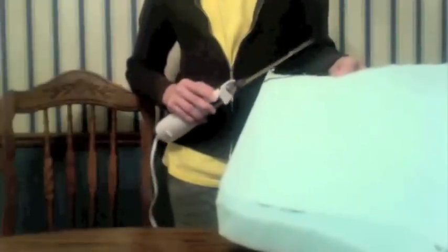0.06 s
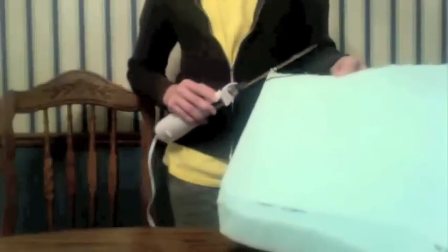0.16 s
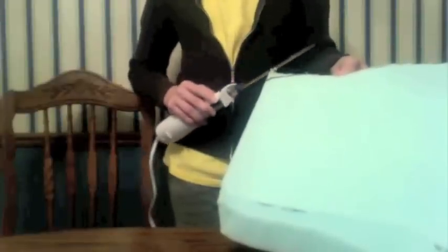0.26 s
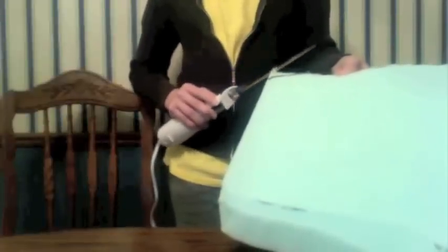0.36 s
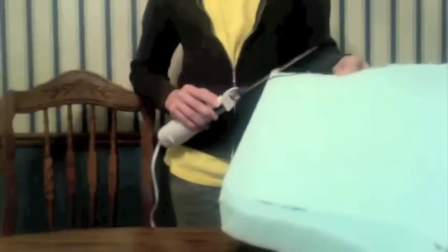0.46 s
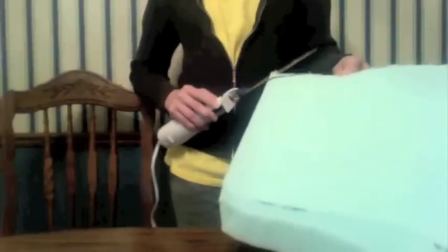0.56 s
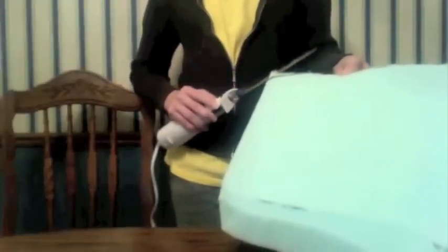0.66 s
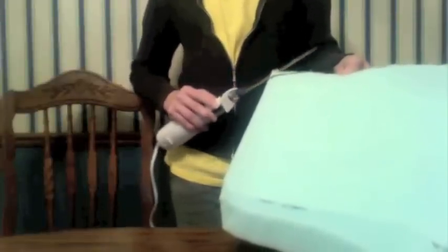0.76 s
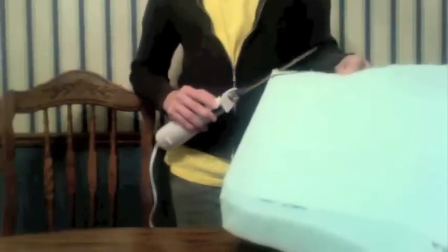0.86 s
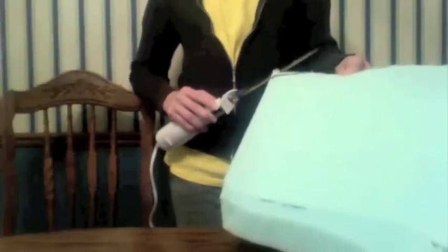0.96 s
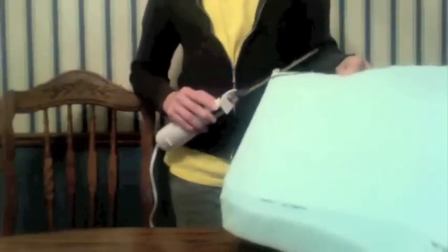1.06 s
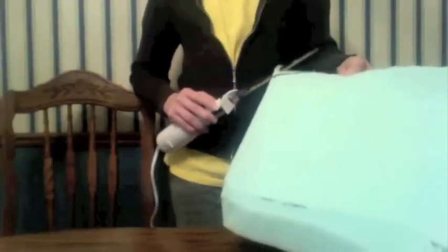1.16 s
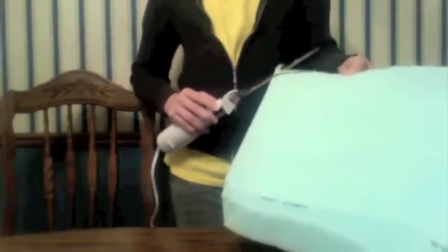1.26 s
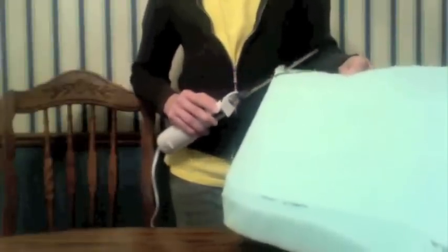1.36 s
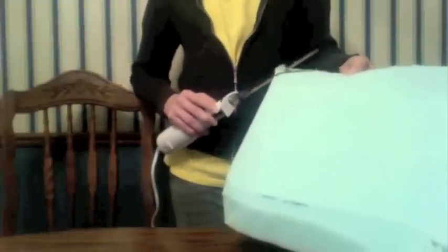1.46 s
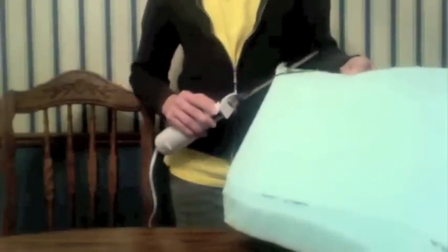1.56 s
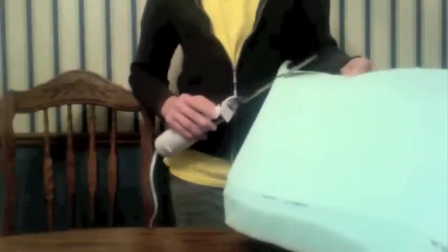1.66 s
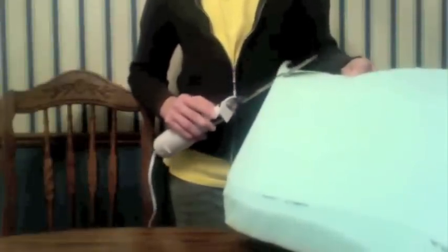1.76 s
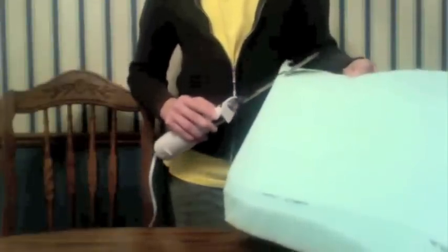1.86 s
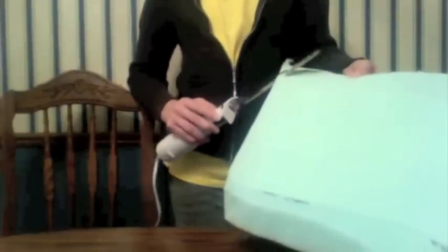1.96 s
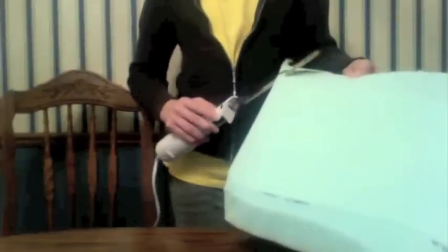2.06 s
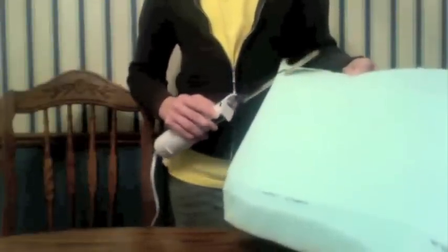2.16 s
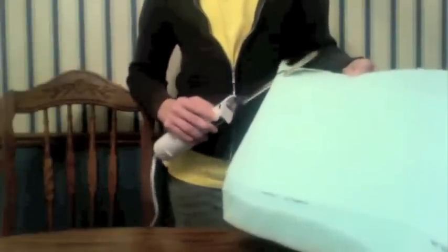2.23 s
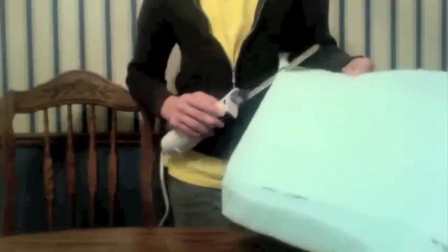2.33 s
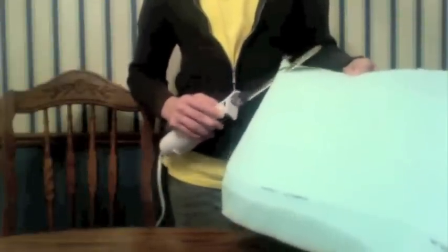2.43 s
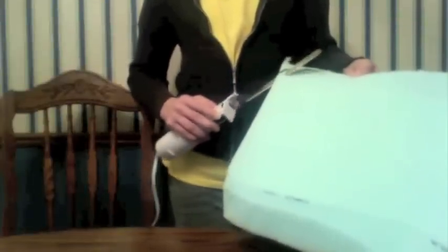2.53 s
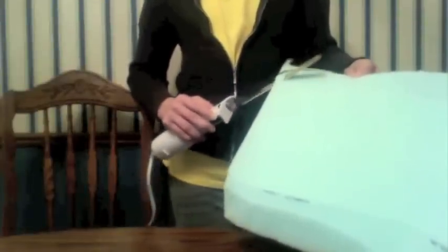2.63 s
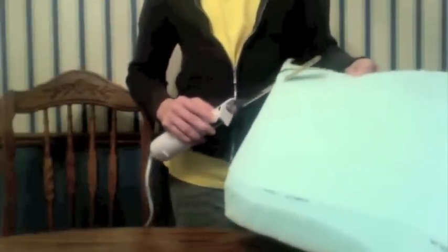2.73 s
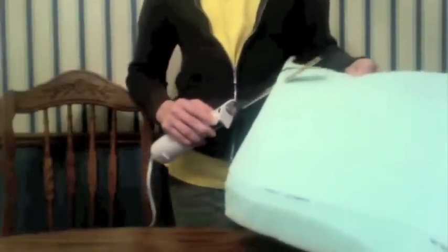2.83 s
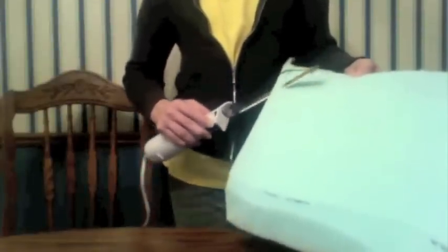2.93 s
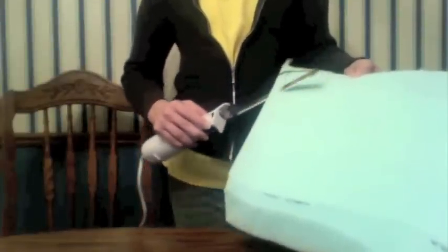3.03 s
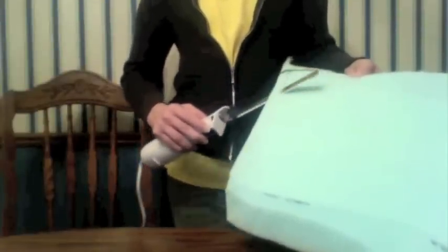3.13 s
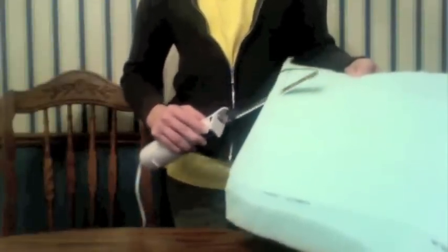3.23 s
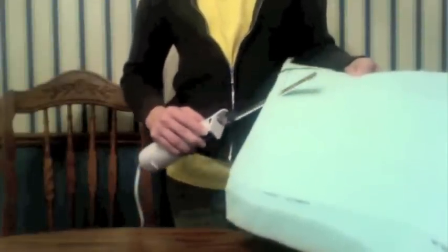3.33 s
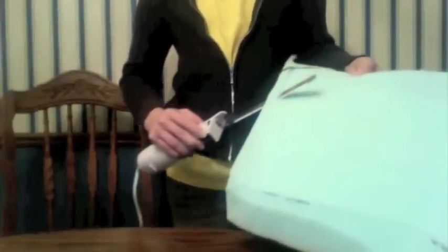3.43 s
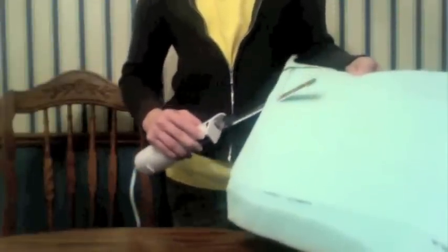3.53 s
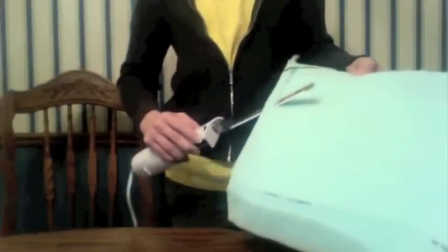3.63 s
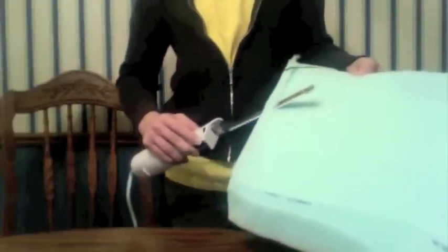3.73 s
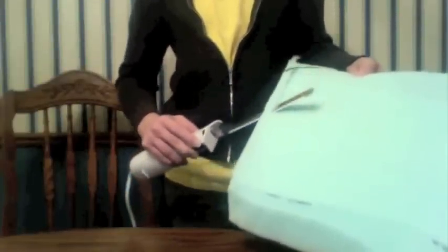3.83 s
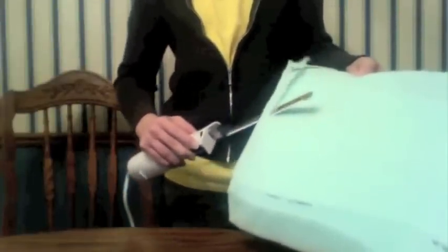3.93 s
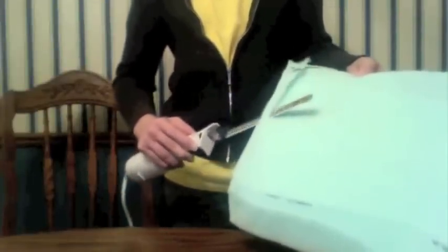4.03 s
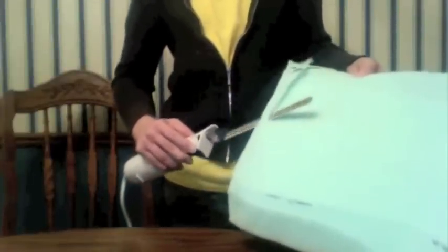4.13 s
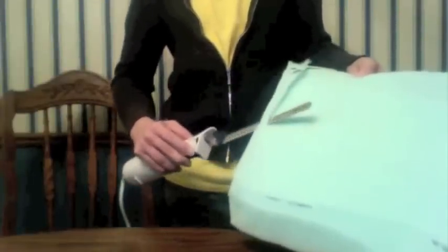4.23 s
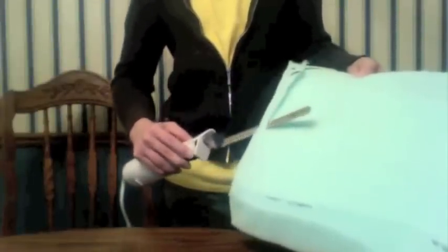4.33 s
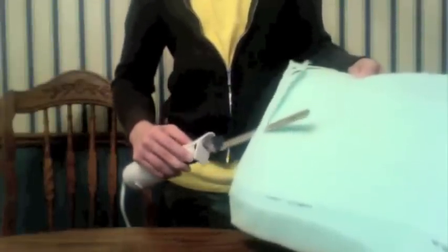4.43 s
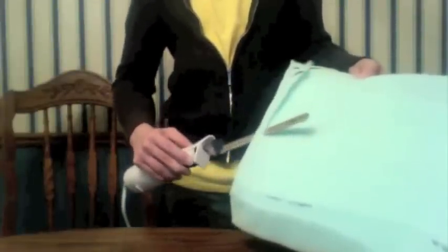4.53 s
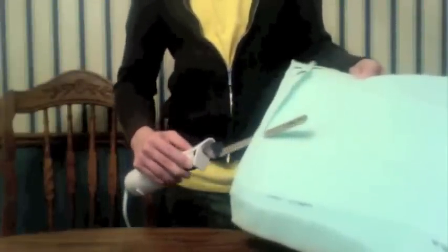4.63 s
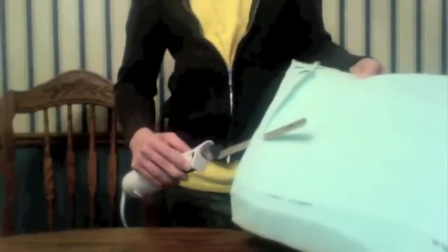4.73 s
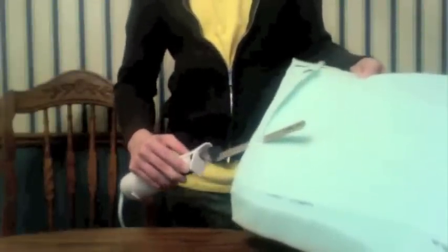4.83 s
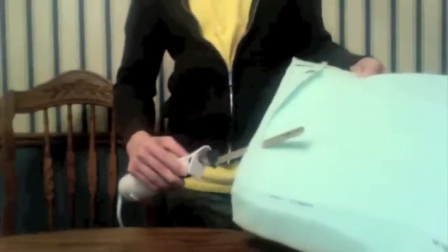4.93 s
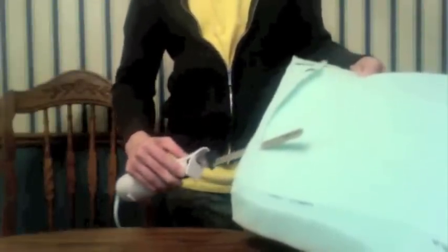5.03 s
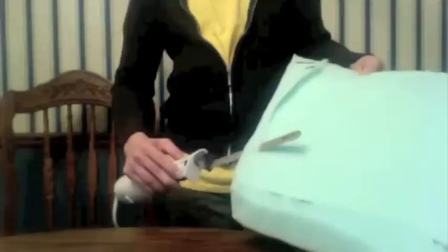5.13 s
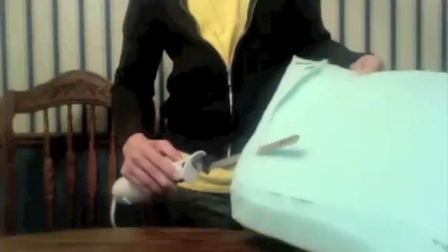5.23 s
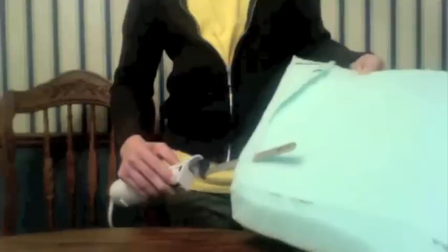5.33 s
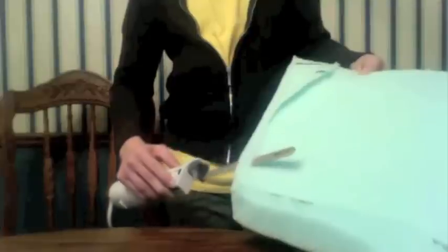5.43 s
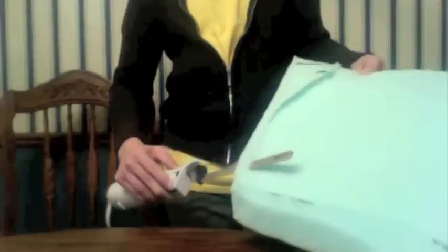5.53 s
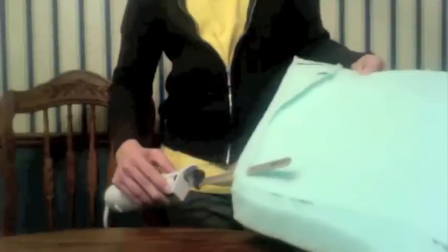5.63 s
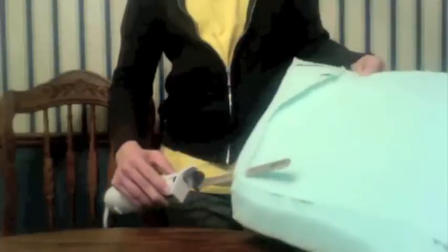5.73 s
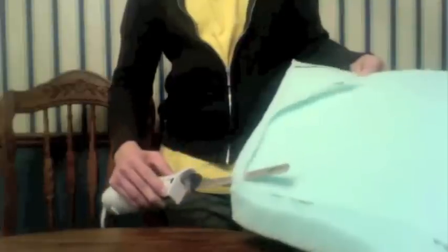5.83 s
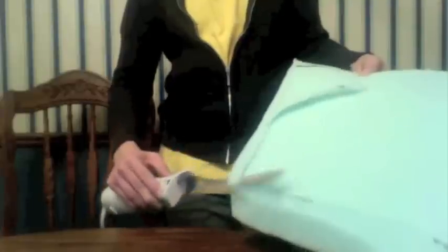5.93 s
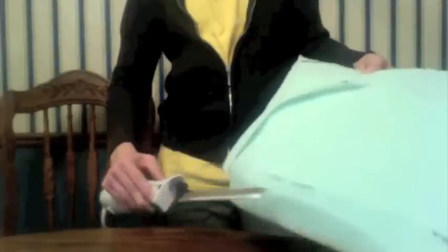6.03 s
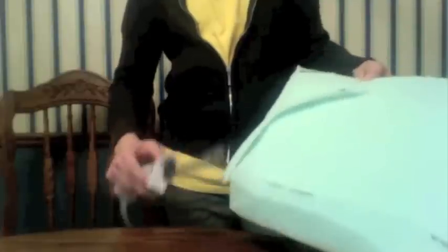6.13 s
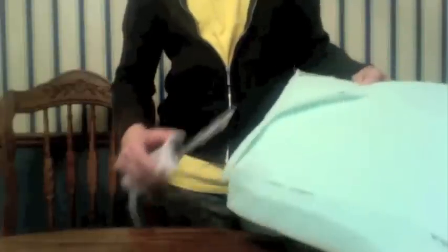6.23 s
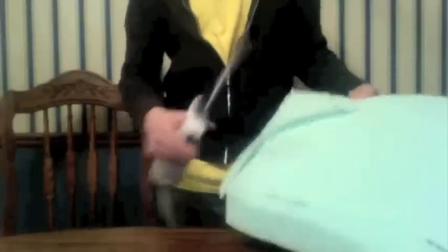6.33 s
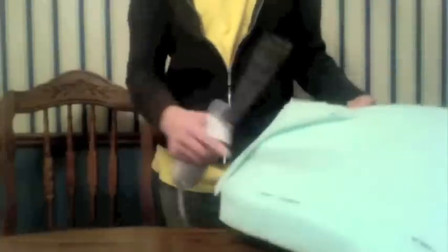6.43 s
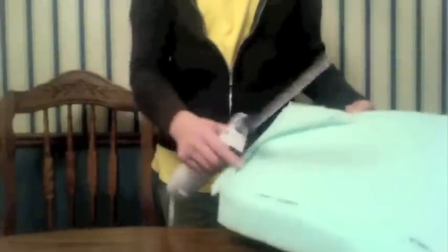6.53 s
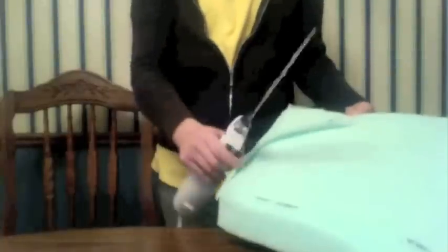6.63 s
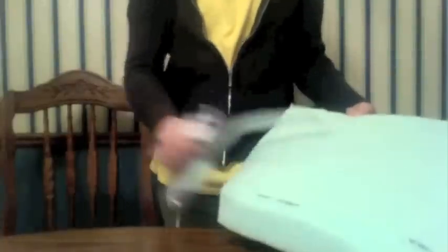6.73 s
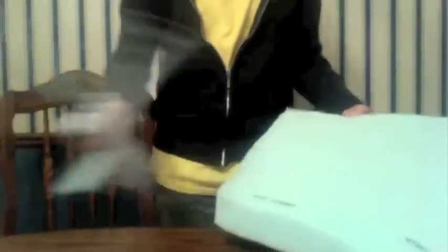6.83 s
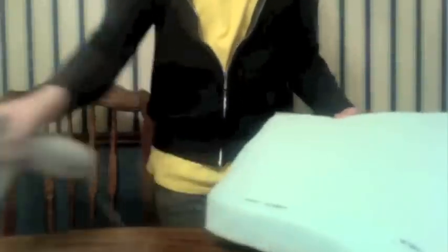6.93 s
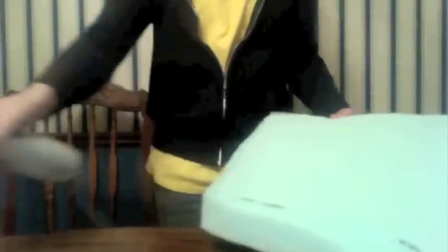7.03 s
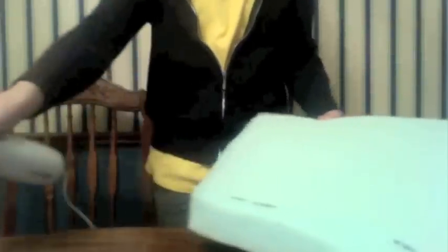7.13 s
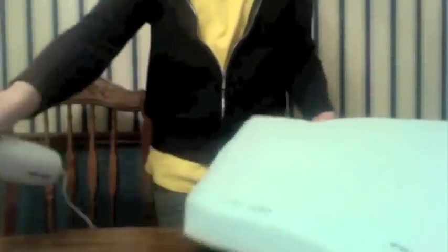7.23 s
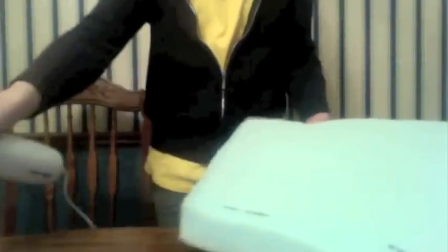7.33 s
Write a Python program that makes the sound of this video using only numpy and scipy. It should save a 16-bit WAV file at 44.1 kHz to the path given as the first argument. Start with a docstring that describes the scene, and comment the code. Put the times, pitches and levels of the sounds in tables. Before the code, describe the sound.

A close, loud electric carving knife in a small, slightly reverberant room. It is already starting at 0 s, its whine climbing to full speed within about half a second. The loose steel blades rattle in a bright, dense buzz of some eighty strokes per second, with a singing tone from about 0.6 s. From 1.5 to 2.7 s the blades bite into foam: rough clashes, ringing and beaded high squeals, the pitch sagging slightly. Then the sawing is duller, softer and steadier, with a wavering drone and whine. The motor dips briefly around 3.7 s and again near 4.9 s, each time surging back. At about 6 s it is released; the buzz drops in pitch and breaks into slowing clatter, stopping around 6.7 s. Faint room murmur remains, then a short tick at 7 s and a soft low rumble with a brief rustle until the end.

```python
"""First one hears an electric carving knife, its motor whining up to full speed, its blades rattling.
Two blades knock and rub on every stroke; these contact forces excite blades, housing and a small room.
The blades sing, clash and squeal, then saw through a foam slab, which damps and recolours their ring.
Motor tones are fixed multiples of the stroke rate. The trigger slips twice, then friction stops the motor.
A short tick, a soft low rumble with a brief rustle, and faint room murmur and mains hum remain."""
import sys
import numpy as np
from scipy import signal
from scipy.fft import rfft, irfft, next_fast_len
from scipy.io import wavfile
from scipy.ndimage import uniform_filter1d, minimum_filter1d

SR = 44100
rng = np.random.default_rng(int(sys.argv[2]) if len(sys.argv) > 2 else 0)


def unload_wav(signal):
    """Save mono or channel-first audio to the path in sys.argv[1] as 16-bit WAV at rate SR, clipped to [-1, 1]."""
    wavfile.write(
        sys.argv[1],
        SR,
        np.round(np.clip(np.atleast_2d(signal).T, -1, 1) * 32767).astype(np.int16),
    )


N = 325744
TIME = np.arange(N) / SR
SIZE = next_fast_len(N + SR // 2)   # room for filter tails
HZ = np.maximum(np.arange(SIZE // 2 + 1) * SR / SIZE, 1)


def from_db(db):
    """Logarithmic level: decibels become an amplitude gain."""
    return 10 ** (np.asarray(db) / 20)


def rms_one(x):
    """Normalisation: scale to unit mean power."""
    return x / np.sqrt(np.mean(x ** 2) + 1e-20)


def local_power(x):
    """Short-time power: the mean square over about 90 ms."""
    return np.abs(uniform_filter1d(x ** 2, size=4001))


def evened(x):
    """Short-time normalisation: unit power from moment to moment; single strokes keep their shape."""
    return x / np.sqrt(local_power(x) + 1e-12)


def in_time(rows):
    """Linear interpolation: the second column of a curve at every sample."""
    seconds, values = np.transpose(rows)
    return np.interp(TIME, seconds, values)


def held(start, end, ramp_s):
    """Envelope: attack, hold and release, 0 to 1; the ramps are centred on start and end."""
    return np.clip(np.minimum(TIME - start, end - TIME) / ramp_s + .5, 0, 1)


def colour(points):
    """Spectral envelope: gain at every frequency, interpolated in dB over log frequency."""
    hz, db = np.transpose(points)
    return from_db(np.interp(np.log(HZ), np.log(hz), db))


def filtered(x, gain):
    """Linear filtering: multiply the spectrum by a frequency response."""
    return irfft(rfft(x, SIZE) * gain, SIZE)[:N]


def slow_noise(rate_hz):
    """Low-pass filtering: white noise keeps its power below about rate_hz."""
    return rms_one(filtered(rng.standard_normal(N), 1 / (1 + (HZ / rate_hz) ** 2)))


def noise(points):
    """Coloured noise: white noise shaped by a spectral envelope, unit power."""
    return rms_one(filtered(rng.standard_normal(N), colour(points)))


# presses of the trigger: (pressed [s], released [s], share of full speed lost while released [1/s])
TRIGGER_PRESSES = [(-.205, 3.625, 1.8), (3.775, 4.8, 1.85), (4.94, 6.02, 1.36)]
SPIN_UP_S = .145   # time constant of the motor gathering speed


def trigger():
    """Exponential approach to full speed under current, linear slowing by friction: speed share, current."""
    pace, powered = np.zeros(N), 0
    for pressed, released, braking in TRIGGER_PRESSES:
        lacking = 1 - np.interp(pressed, TIME, pace)
        time_driven = np.clip(TIME - pressed, 0, released - pressed)
        driven = 1 - lacking * np.exp(-time_driven / SPIN_UP_S)
        slowed = driven - braking * np.maximum(TIME - released, 0)
        pace = np.where(TIME < pressed, pace, slowed)
        powered = powered + held(pressed, released + 0.042, ramp_s=0.051)
    return np.maximum(pace, .01), powered


# full speed, sagging as the hand presses: (time [s], blade stroke rate [Hz])
CRUISE_SPEED = [(.4, 83.5), (1.35, 83.3), (1.6, 83.65), (1.77, 82.6), (2.08, 81.9), (2.25, 82.9),
                (2.45, 82.8), (2.62, 82.2), (2.78, 82.7), (3.2, 81.9), (3.63, 82.3), (4.55, 82.7),
                (4.81, 81.9), (5.3, 83.5), (6.02, 84.3)]


def stroke_count(pace):
    """Phase is the integral of frequency: blade strokes completed, with a slight wander of speed."""
    stroke_hz = in_time(CRUISE_SPEED) * pace * (1 + .0012 * slow_noise(14))
    return np.cumsum(stroke_hz) / SR


BITE_S, BITE_TAKES_S = 1.613, 0.22   # middle and length of the bite


def seated():
    """Preload: the foam presses the blades together, 0 to 1, and they stay seated."""
    return held(BITE_S, np.inf, BITE_TAKES_S)


def depth():
    """Contact damping grows with depth in the foam, 0 to 1: blades sink in, cut, come out at its edge."""
    return np.interp(TIME, [1.5, 2.7, 5.95, 6.15], [0, 1, 1, 0])


def knocks(turn, jitter_s, uneven_db, count=16):
    """Periodic impacts: play in the drive closes at the same points of each stroke, never quite equally."""
    strokes = np.arange(int(turn[-1]))[:, None]
    places = (np.arange(count) + rng.random(count)) / count
    when = np.interp(strokes + places, turn, TIME)
    when = when + jitter_s * rng.standard_normal(when.shape)
    direction = rng.choice([-1, 1], count)   # each place always knocks the same way
    impulse = direction * from_db(uneven_db * rng.uniform(-0.43, 1, when.shape))
    sample = np.clip(np.round(when * SR).astype(int), 0, N - 1)
    return rms_one(np.bincount(sample.ravel(), impulse.ravel(), N))


def smeared(x, ring_s):
    """All-pass dispersion: the plastic shell spreads each knock over milliseconds without colouring it."""
    shell = rfft(rng.standard_normal(N) * np.exp(-TIME / ring_s), SIZE)
    return filtered(x, shell / np.abs(shell))


def contacts(turn, pace, rub_db, high_rub_db, reversal_db, stroke_db, flutter_db, loose_db):
    """Impact and friction, hardest where the blades reverse; at low speed the single blows stand out."""
    angle = 2 * np.pi * turn
    pulse_db = reversal_db * np.cos(2 * angle) + stroke_db * (np.cos(angle) + np.cos(4 * angle))
    slow_emphasis = 1 + 0.5 * (1.5 - pace)
    pressure = from_db(pulse_db * slow_emphasis + flutter_db * slow_noise(25))
    hits = smeared(pressure * knocks(turn, jitter_s=.000045, uneven_db=3.5), ring_s=.0009)
    chatter = pace * from_db(loose_db * (1 - depth()))   # free blades chatter less regularly
    friction = pressure * chatter * rng.standard_normal(N)
    rub = filtered(friction, colour([(300, rub_db), (8000, high_rub_db)]))
    return hits + rub


def room(x, t60, wet_db, count=6):
    """Diffuse reverberation: decaying echoes that follow the direct level and shift as the knife moves."""
    wet = 0
    for _ in range(count):
        echoes = rng.standard_normal(N) * from_db(-60 * TIME / t60) * (TIME > .003)
        response = rfft(echoes / np.linalg.norm(echoes), SIZE)
        wet = wet + slow_noise(1.0) * filtered(x, response)
    return x + from_db(wet_db) * evened(wet) * np.sqrt(local_power(x))


# housing, blade ring, blade scrape, gear sizzle, hiss; levels at full speed before force and clashes:
# (from [Hz], to [Hz], loose level [dB], seated level at the bite [dB], later change [dB/s],
#  share of a clash [1], power of speed [1])
RATTLE_BANDS = [(213, 1020, -29.5, -35.5, 0.28, .1, 2.4), (1035, 2390, -18, -25, -0.81, 0.67, 2.9),
                (2454, 4750, -14.5, -19.5, -0.92, .7, 2.82), (5130, 7470, -17.5, -21.5, 0.22, .4, 3.1),
                (7630, 20400, -15, -23.5, 0, .1, 2.6)]
# colour within the bands, blades in the air and in the foam: (frequency [Hz], relative level [dB])
AIR_COLOUR = [(70, -44), (150, -32.5), (280, -27), (420, -20), (700, -13), (1000, -13), (1300, 2.5),
              (1800, 1.5), (2500, -5), (3100, 3.5), (4500, -4.5), (6500, 2.5), (7300, -5), (11000, 1.5),
              (15500, -4)]
FOAM_COLOUR = [(70, -38), (150, -13), (280, -11), (420, -5.5), (650, -1.5), (1000, -4.5), (1300, 2),
               (1800, 2), (2400, -5.5), (3000, -0.5), (4500, -5.5), (6300, 0.5), (7300, -7), (11000, 2),
               (15500, -3)]
# resonances and hollows of blades and housing: (centre [Hz], width [Hz], relative level [dB])
BODY_RESONANCES = [(1290, 200, 2.5), (1553, 230, 6.5), (1832, 120, -3.5), (2140, 100, 2), (2500, 210, -2.5),
                   (2790, 100, -0.5), (3530, 350, 0.5), (4320, 640, 4), (4635, 250, -2.5), (4790, 200, 3),
                   (6600, 380, -2), (7890, 230, 4), (8450, 720, -5), (9110, 410, 6), (12600, 1400, -1.5),
                   (14000, 1100, 4)]
# how hard the blades knock and rub, which the whine follows too: (time [s], level [dB])
CONTACT_FORCE = [(0, 0), (.75, 0.5), (1.27, -1), (1.34, -2.5), (1.43, 0), (2.4, -0.5), (2.5, -1.6),
                 (3, -2.45), (3.7, -4), (4.02, 1), (4.3, 0.1), (4.8, -1.5), (5.25, .7), (5.6, 0),
                 (5.92, -1.5), (6.04, 3), (6.12, 5), (6.35, 2.5), (6.55, 3.5)]
# the blades twist and clash harder: (start [s], end [s], added level before the band's share [dB])
BLADE_CLASHES = [(0.7, .8, 0.5), (1.126, 1.293, 2.5), (1.542, 1.724, 4), (1.7, 2.088, 5), (2.125, 2.234, 8),
                 (2.259, 2.428, 5.5), (2.493, 2.66, 1.5)]


def rattle(force, pace):
    """Source and filter: contacts drive blades, housing and room; speed and clashes add, the foam damps."""
    body_db = sum(db / (1 + (2 * (HZ - hz) / width) ** 2) for hz, width, db in BODY_RESONANCES)
    sound = rfft(room(force, t60=0.29, wet_db=0.5), SIZE) * from_db(body_db)
    in_air, in_foam = sound * colour(AIR_COLOUR), sound * colour(FOAM_COLOUR)
    sunk, seat = depth(), seated()
    force_db = in_time(CONTACT_FORCE)
    clash_db = sum(db * held(start, end, ramp_s=0.03) for start, end, db in BLADE_CLASHES)
    out = 0
    for low, high, loose_db, seated_db, db_per_s, clash_share, power in RATTLE_BANDS:
        band = 1 / np.sqrt((1 + (low / HZ) ** 16) * (1 + (HZ / high) ** 16))
        air_part = irfft(in_air * band, SIZE)[:N]
        foam_part = irfft(in_foam * band, SIZE)[:N]
        part = (1 - sunk) * air_part + sunk * foam_part
        cutting_db = seated_db + db_per_s * (TIME - BITE_S)
        db = loose_db + seat * (cutting_db - loose_db) + force_db + clash_share * clash_db
        out = out + pace ** power * from_db(db) * evened(part)
    return out


# a mode of the blades (high) or of the housing (low) rings out, and a brief bright swell near 6.5 kHz # rises
# as the motor regains speed; level at full speed: # (start [s], end [s], frequency [Hz], width [Hz], level
# [dB])
RINGING_MODES = [(0.043, 0.29, 680, 400, -30.5), (0.385, 0.526, 1507, 90, -23),
                 (1.955, 2.1, 2250, 250, -26.5), (2.146, 2.226, 1513, 130.4, -18.5),
                 (2.275, 2.427, 3370, 700, -18), (2.312, 2.4, 1514, 130, -22.5),
                 (2.483, 2.69, 1495, 110, -27), (2.85, 3.62, 2830, 130, -33.5),
                 (3.87, 4.32, 1528, 110, -27), (4.15, 4.21, 6470, 400, -19), (5.2, 5.38, 656, 300, -39),
                 (5.448, 6.448, 1366, 149, -35.5), (6.05, 6.142, 680, 399, -35.5)]


def rings(force, pace):
    """Modal resonance: as grip and angle change, the contacts set single modes ringing for a while."""
    out = 0
    for start, end, hz, width_hz, db in RINGING_MODES:
        radius = np.exp(-np.pi * width_hz / SR)
        zeros = [1, 0.0026, -1]
        poles = [1, -2 * radius * np.cos(2 * np.pi * hz / SR), radius * radius]
        once = signal.lfilter(zeros, poles, force)
        twice = signal.lfilter(zeros, poles, once)
        out = out + from_db(db) * held(start, end, ramp_s=0.054) * evened(twice)
    return pace ** 2.3 * out


def tone(turn, order, waver_db):
    """Harmonic order: a sine at a whole multiple of the stroke; its strength wavers as the knife moves."""
    sine = np.sqrt(2) * np.sin(2 * np.pi * (round(order) * turn + rng.random()))
    return sine * from_db(waver_db * np.tanh(slow_noise(6.8)))


# steel squeals on steel, added to a faint steady squeal, level at full speed:
# (start [s], end [s], level [dB])
STEEL_SQUEALS = [(1.497, 1.698, -25), (1.857, 2.2, -24), (2.557, 2.68, -27), (5.3, 5.764, -39)]
SONG_START_S, SONG_END_S = .57, 1.68
SONG_DB, SONG_FADE_DB_PER_S = -19, 7   # level at the start and full speed, then fading


def blade_tones(turn):
    """Stick-slip: the loose blades sing until they bite; steel on steel gives a rough, beaded squeal."""
    song_db = SONG_DB - SONG_FADE_DB_PER_S * (TIME - SONG_START_S)
    song = held(SONG_START_S, SONG_END_S, ramp_s=0.064) * from_db(song_db)
    bursts = sum(from_db(db) * held(start, end, ramp_s=0.054) for start, end, db in STEEL_SQUEALS)
    squeal = from_db(-34.5) + bursts
    beads = from_db(9.6 * np.tanh(slow_noise(90)) - 2.5)
    rough_turn = turn + .0035 * slow_noise(70)
    singing = song * tone(turn, order=15, waver_db=3.5)
    return singing + squeal * beads * tone(rough_turn, order=40, waver_db=4.5)


# motor whine and its side tones, level at full speed and 0 dB force, under load:
# (multiple of the stroke, rounded when played [1], loose level [dB], seated level [dB])
WHINE_ORDERS = [(60, -33, -41), (77.3, -37.5, -30), (79.6, -26, -24), (84, -37, -37.5), (120.7, -28.5, -41)]


def whine(turn, pace):
    """Phase modulation: armature tones follow the force on the blades and are shaky below full speed."""
    shaky_turn = turn + (0.00096 + 0.013 * (1 - pace)) * slow_noise(70)
    seat, tones = seated(), 0
    for order, loose_db, seated_db in WHINE_ORDERS:
        level = from_db(loose_db + seat * (seated_db - loose_db))
        tones = tones + level * tone(shaky_turn, order, waver_db=6.5)
    return pace ** 3 * from_db(1.7 * in_time(CONTACT_FORCE)) * tones   # 1.7 dB per dB of force


def spin_up(turn, pace, order, width_hz, db, foam_db):
    """Amplitude modulation: as the motor gathers speed, a rough whistle climbs with it, weaker in foam."""
    rasp = slow_noise(width_hz)
    current = np.sqrt(np.clip(1 - pace - .025, 0, .1))
    whistle = np.sqrt(2) * np.sin(2 * np.pi * order * turn)
    return from_db(db + foam_db * depth()) * current * rasp * whistle


# steady orders, level at full speed:
# (multiple of the stroke, rounded when played [1], level in air [dB], level in foam [dB])
HUM_ORDERS = [(1, -87.5, -73), (1.995, -70, -61), (4, -66, -51.5), (5, -43.5, -58), (6, -52.5, -55),
              (7, -48, -53), (14, -37, -51), (16, -47, -52.5), (17, -42.5, -36.5), (18, -28.5, -57),
              (19, -33, -36.5), (20, -35, -44.5), (34, -41, -40.5), (36, -33.5, -43)]
# drone on ten times the stroke and thrum on three times, at full speed: (time [s], level [dB])
DRONE_LEVEL = [(.25, -35), (.46, -27.5), (.62, -42.5), (1.55, -48), (1.85, -29), (2.03, -27.5),
               (2.15, -35.5), (2.85, -36), (3.1, -32.5), (3.62, -33.5), (3.75, -42), (4.05, -47),
               (4.38, -28), (4.8, -31), (5.1, -45.5), (5.34, -27.5), (5.5, -48), (5.95, -36)]
THRUM_LEVEL = [(.6, -67), (1, -48.5), (2, -49), (2.25, -58), (3.15, -62), (3.45, -45), (3.8, -55.5),
               (4.22, -48), (4.45, -54), (4.8, -60), (5.4, -46.5), (5.92, -48)]


def motor(turn, pace, powered):
    """Order spectrum of crank, blades and armature; the deepest outlast brief dips, the rest need current."""
    sunk = depth()
    load = np.interp(TIME, [5.85, 6.08], [1, 0])   # the blades run out of the slab's edge
    thrum = load * pace ** 2 * from_db(in_time(THRUM_LEVEL)) * tone(turn, order=3, waver_db=2.5)
    hum = 0
    for order, air_db, foam_db in HUM_ORDERS:
        drive = powered * pace ** 4 if order > 2 else load * pace
        level = from_db(air_db + sunk * (foam_db - air_db))
        hum = hum + drive * level * tone(turn, order, waver_db=5.5)
    drone = pace ** 8 * from_db(in_time(DRONE_LEVEL)) * tone(turn, order=10, waver_db=1.0)
    whistle = spin_up(turn, pace, order=79, width_hz=350, db=-3.5, foam_db=-16)
    driven_tones = drone + pace ** 8 * blade_tones(turn) + load * whine(turn, pace) + whistle
    return thrum + hum + powered * driven_tones


# a short tick: (time [s], decay time constant [s], level before its envelope [dB])
TICK_EVENT = (6.993, 0.0069, -47.5)
# its colour: (frequency [Hz], relative level [dB])
TICK_SPECTRUM = [(700, -23.5), (1600, 1), (3000, 1), (6500, -1), (8000, -12), (10000, -30)]


def tick():
    """Transient: coloured noise with a steep attack and an exponential decay."""
    start, decay_s, db = TICK_EVENT
    envelope = held(start, np.inf, ramp_s=0.0042) * np.exp(-np.abs(TIME - start) / decay_s)
    return from_db(db) * envelope * noise(TICK_SPECTRUM)


def grainy_noise(start, end, db, points, grain_db):
    """Random amplitude modulation: a stretch of coloured noise made grainy."""
    level = from_db(db + grain_db * slow_noise(45))
    return held(start, end, ramp_s=0.0484) * level * noise(points)


# colours of the low rumble and of the brighter rustle: (frequency [Hz], relative level [dB])
RUMBLE_SPECTRUM = [(30, -28.5), (70, -16), (130, -10), (230, 5.5), (350, -4), (600, -11), (1400, -15.5),
                   (1950, -24), (2200, -19.5), (2550, -22), (3500, -25), (4200, -24), (9000, -31),
                   (14000, -51.5)]
BRIGHT_SPECTRUM = [(200, -10), (600, 4), (1800, -1), (2200, 5), (2600, -9), (3500, -7), (4200, -22),
                   (9000, -35)]


def rumble_and_rustle():
    """Coloured noise: a soft low rumble swells up after the tick, a brief brighter rustle at its start."""
    rumble = grainy_noise(7.05, 7.5, -55, RUMBLE_SPECTRUM, grain_db=1.5)
    rustle = grainy_noise(7.035, 7.19, -57.5, BRIGHT_SPECTRUM, grain_db=1.8)
    return rumble + rustle


# level of the room murmur: (time [s], level [dB])
MURMUR_LEVEL = [(6.5, -59), (6.68, -60), (6.76, -63.5), (6.85, -60.5), (6.93, -57.5), (6.98, -68),
                (7.02, -78), (7.1, -68)]
# its colour: (frequency [Hz], relative level [dB])
MURMUR_SPECTRUM = [(40, -45.5), (150, -25), (300, -10.5), (480, -2), (900, -13), (2000, -19), (3500, -22.5),
                   (7000, -29), (10000, -26), (15000, -43)]
MAINS_HZ, MAINS_DB = 120, -81.5


def background():
    """Stationary spectra: murmur is coloured noise of varying level, mains hum is a steady sine."""
    murmur = from_db(in_time(MURMUR_LEVEL)) * noise(MURMUR_SPECTRUM)
    mains = from_db(MAINS_DB) * np.sin(2 * np.pi * MAINS_HZ * TIME)
    return murmur + mains


def scene():
    """Superposition: the stroke rate drives every part of the knife; both channels hear the same."""
    pace, powered = trigger()
    turn = stroke_count(pace)
    force = contacts(turn, pace, rub_db=-3.5, high_rub_db=1.0, reversal_db=1.5, stroke_db=1.72,
                     flutter_db=0.85, loose_db=12.5)
    coasting = from_db(-1 * (1 - powered))   # without current the blades knock 1 dB more softly
    knife = coasting * rattle(force, pace) + rings(force, pace) + motor(turn, pace, powered)
    return np.tile(knife + tick() + rumble_and_rustle() + background(), (2, 1))


def record(dry):
    """Saturation rounds loud peaks, a fast limiter holds them under full scale, a steep low-pass follows."""
    headroom, ceiling, window, cutoff_hz = 1.9, .95, 45, 15800   # window in samples, about 1 ms
    dry = headroom * np.tanh(dry / headroom)
    needed = 1 / np.maximum(np.abs(dry) / ceiling, 1)
    gain = uniform_filter1d(minimum_filter1d(needed, size=window), size=window)
    low_pass = 1 / np.sqrt(1 + (HZ / cutoff_hz) ** 300)
    return np.array([filtered(x, low_pass) for x in dry * gain])


dry = scene()
out = record(dry)
unload_wav(out)
```